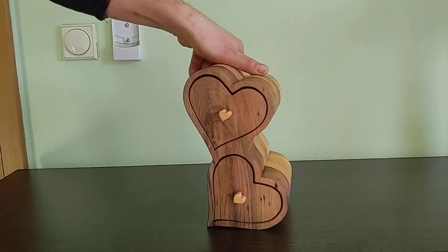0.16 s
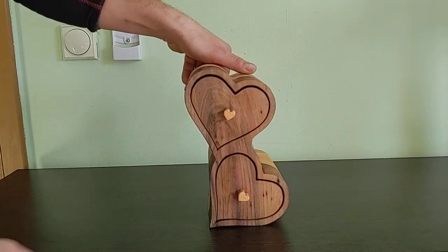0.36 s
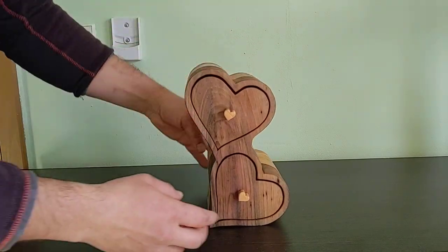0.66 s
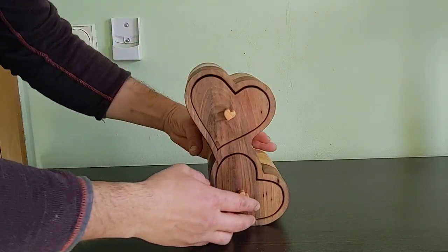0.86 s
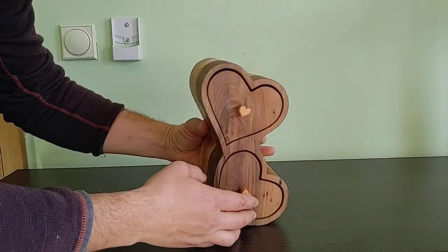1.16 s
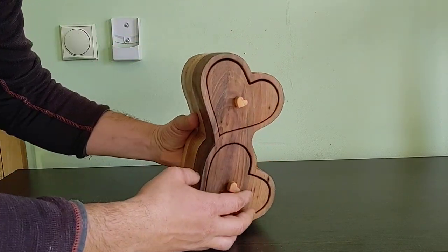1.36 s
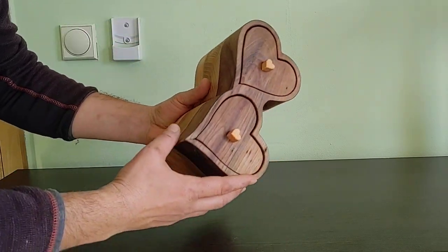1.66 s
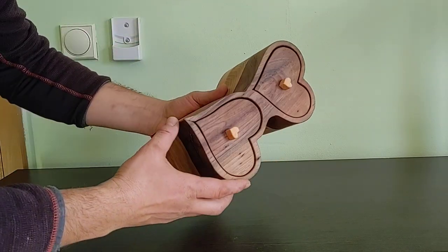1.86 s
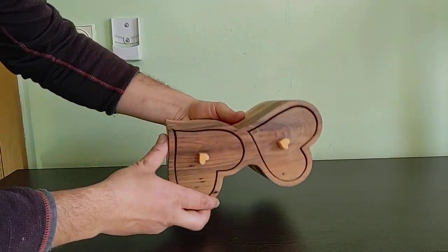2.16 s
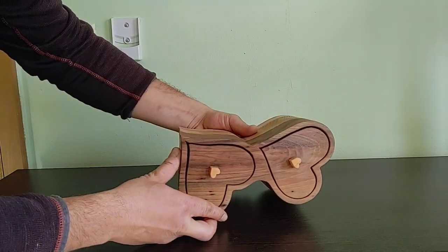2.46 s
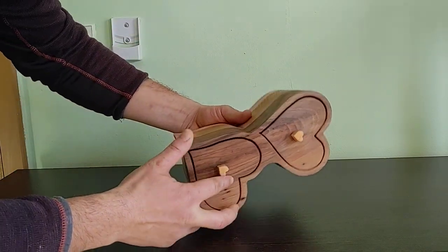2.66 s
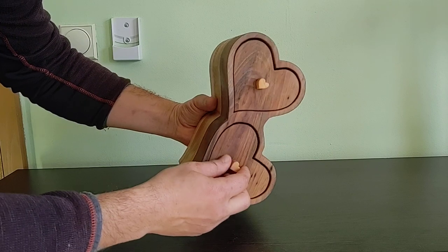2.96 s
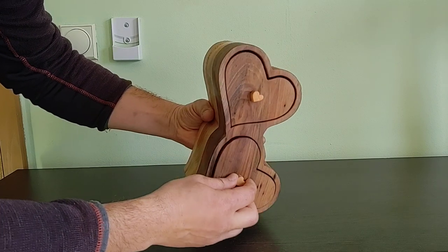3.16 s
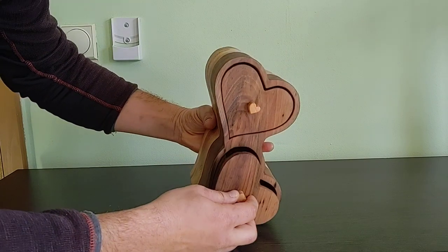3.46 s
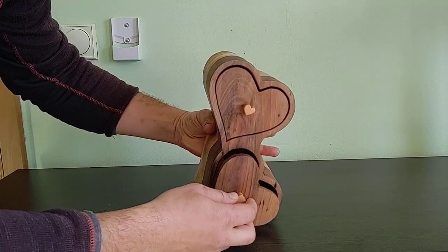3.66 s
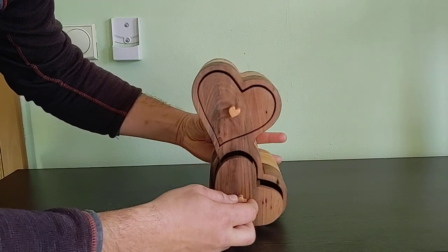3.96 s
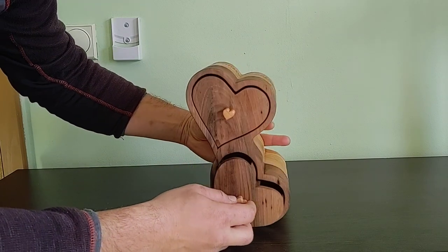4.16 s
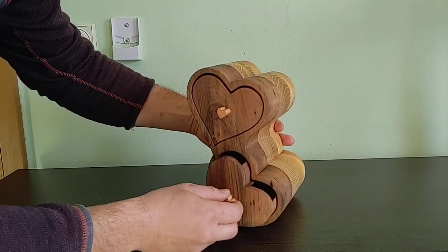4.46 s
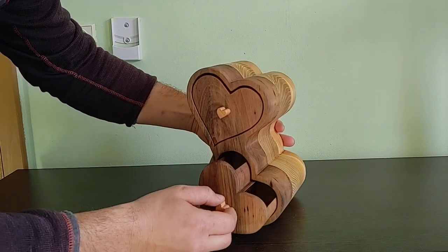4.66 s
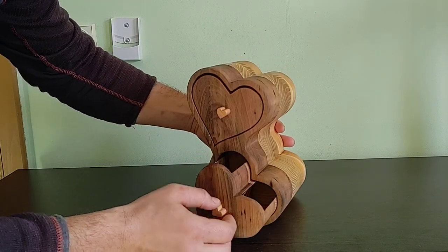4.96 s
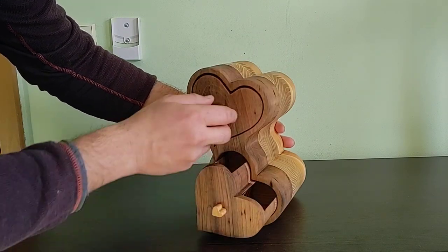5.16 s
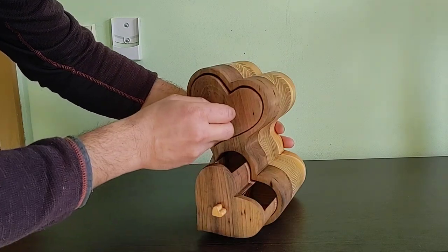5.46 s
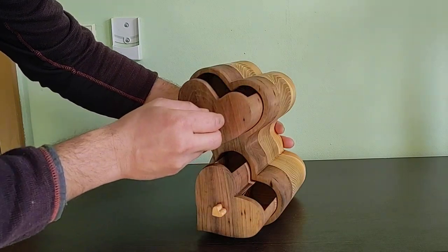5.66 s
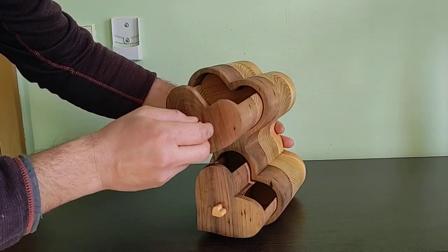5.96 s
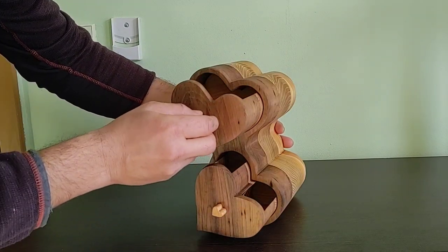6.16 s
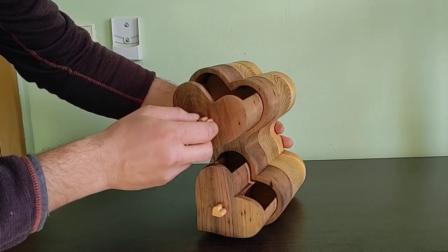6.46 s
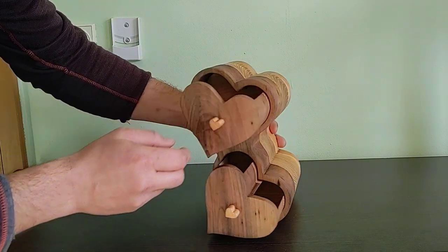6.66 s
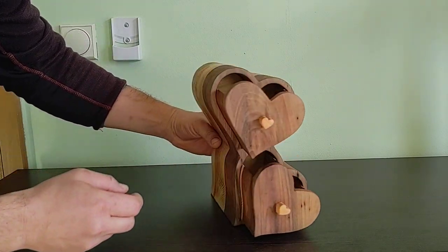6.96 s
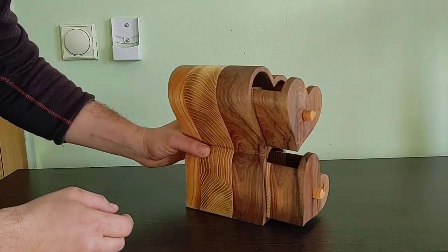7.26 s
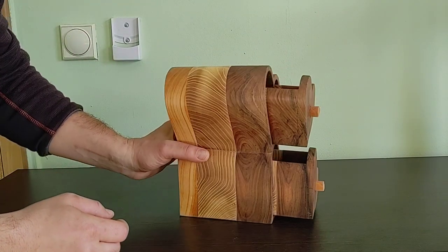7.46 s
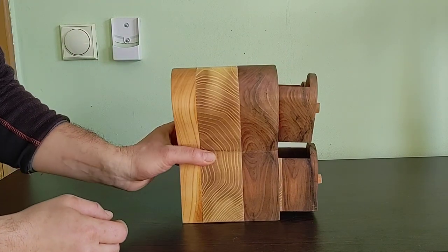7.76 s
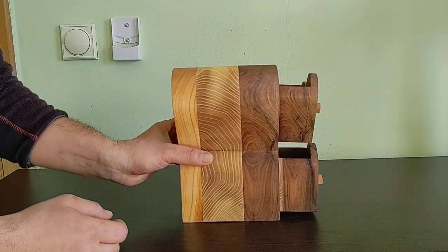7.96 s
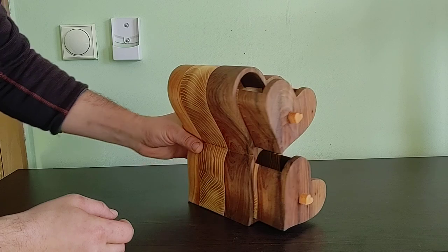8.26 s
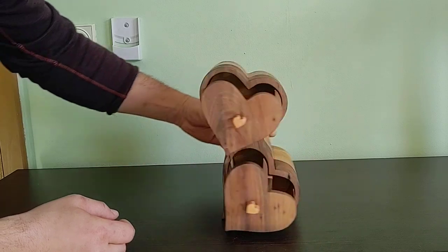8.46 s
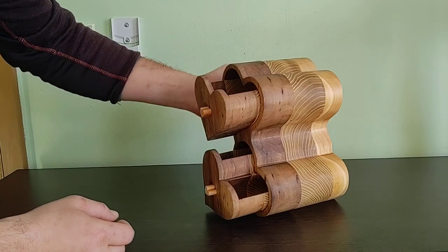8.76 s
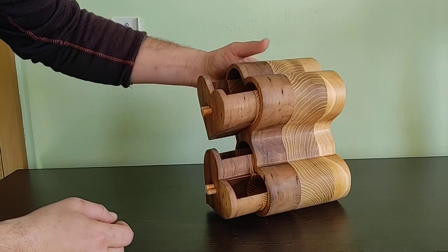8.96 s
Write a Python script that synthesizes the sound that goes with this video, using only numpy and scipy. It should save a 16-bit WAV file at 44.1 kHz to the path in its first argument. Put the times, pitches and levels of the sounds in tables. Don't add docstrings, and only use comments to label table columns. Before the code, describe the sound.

A small wooden box with drawers scrapes and knocks on a hollow table, its drawers rattle and slide open, then it grinds round in long turns.

```python
import sys
import numpy as np
from scipy import signal
from scipy.fft import rfft, irfft
from scipy.io import wavfile
from scipy.ndimage import uniform_filter1d

SR = 44100
rng = np.random.default_rng(int(sys.argv[2]) if len(sys.argv) > 2 else 0)


def elevation(decibels):
    levels = np.asarray(decibels, float)
    return 10 ** (levels / 20)


def dump_mix(stems):
    frames = np.atleast_2d(stems).T
    limited = np.clip(frames, -1, 1)
    pcm = np.round(limited * 32767).astype(np.int16)
    wavfile.write(sys.argv[1], SR, pcm)


N = 400869

# f/Hz, density/dB
HUSH_SPECTRUM = [(18, -48), (30, -13), (177, 4), (389, -4), (673, -6.5), (4300, -9), (4780, -9.5),
                 (6040, -5.5), (7250, -10), (8940, -11.5), (15500, -15)]
HUSH_DB = -75
ROOM_T60_S, ROOM_DB, WIDE_HZ = 0.24, -6, 1300

# start t/s, way/index
HOLDS = [
    (0, 0),
    (1.45, 1),
    (2.8, 2),
    (3.52, 1),
    (4.28, 3),
    (5.15, 4),
    (6.62, 0),
]
# start t/s, end t/s
LIFTS = [
    (1.3, 2.3),
    (2.55, 3.52),
]

# f/Hz, width/Hz, level/dB
TABLE_MODES = [(128.8, 16, -6), (99.5, 50, -19.5), (168.5, 13, -17)]
# f/Hz, width/Hz, then level/dB in each way of holding
BOX_MODES = [(202.2, 7, -3.5, -3.5, -26, -7, -2.5), (240.2, 36.6, -2, -14, -19.5, -1.5, -4.5),
             (268.7, 31, -6, -9, -26, -1.5, -1.5), (317, 30, 2.5, -0.5, -10, -1, -0.5),
             (358.9, 11, -1.5, -13.5, -7, -3.5, -6), (385.9, 17, -5.5, -5.5, -4, -1, -5),
             (459, 25, -3, -10.5, -14, 0, -2.5), (492.6, 7.9, -4.5, -16.5, -14, -6, -4.5),
             (526, 31, -4, -14.5, -22, -11, -11), (576, 28, -4, -10, -20, -7, -21),
             (634, 35, -7.5, -21.5, -13.5, -6, -11.5), (672.2, 16, -2, -13, -14.5, -3, -12),
             (702.7, 20, -6.5, -8.5, -9.5, -5, -13.5), (748, 33, -10, -9, -13.5, -7, -17.5),
             (836, 75, -7, -12, -14.5, -10, -14), (880, 25, -5.5, -18.5, -23, -8.5, -14.5)]
# f/Hz, width/Hz, then level/dB in each way of holding
WALL_MODES = [(944, 23, -3, -5.5, -11, 4, 2), (1055, 79, 0, 0.5, 3, -35, -1.5),
              (1244, 65, 0, 0.5, -1, -31, -8), (1402, 63, -3.5, -6.5, -5, -2.5, -3),
              (1517, 120, -1, -6, -10, -3, -9.5), (1728, 90, -3, -7, 5.5, -2, -6),
              (1900, 81, -5, -6, 1, -3, -5.5), (2110, 150, -0.5, -5.5, 0.5, 2, 2.5),
              (2343, 290, 1, -4.5, -1, 1.5, -1.5), (2652, 310, 0.5, -9, -5, -1, -6),
              (3140, 165, -7.5, -15, -11, 0, -27), (3420, 150, -10, -21.5, -4, -4, -9),
              (4080, 630, -5.5, -17.5, -16, -8, -13), (4155, 120, -8.5, -22, -3, -25, -36),
              (5100, 1400, -47, -32.5, -27, -23, -13)]
# f/Hz, width/Hz, level/dB
FACE_MODES = [(720, 260, -4.5), (1150, 470, -5)]
FACE_DB = [11, -1, -9, 3.5, 0]
RING_T60_S = [0.21, 0.53, 0.29, .4, 0.47]
# f/Hz, density/dB
DUST_SPECTRUM = [(1500, -1.5), (3000, 1), (5000, 1), (7000, -5), (10000, -16), (15000, -31.5)]
DUST_DB = [-24.5, -17.5, -11.5, -15.5, -10]

# t/s, length/s, f/Hz, half
# width/Hz, level/dB
SKIDS = [(1.112, 0.025, 530, 35, -60), (1.156, 0.04, 448, 29, -40), (1.184, 0.066, 2600, 190, -48),
         (3.285, 0.082, 1850, 150, -60), (5.266, 0.06, 4450, 120, -71.5), (8.608, 0.099, 4540, 800, -48),
         (8.86, .1, 223, 28, -59.5), (9.03, 0.063, 225, 30, -63), (8.513, 0.26, 692, 14.6, -42),
         (2.87, .11, 5600, 200, -70), (2.95, .13, 5850, 170, -68), (3.06, .07, 5600, 180, -69),
         (3.12, .07, 5250, 200, -72), (0.91, 0.47, 5700, 320, -76), (3.3, .05, 2000, 120, -60),
         (.628, .055, 2200, 700, -43), (1.21, .08, 800, 100, -51), (.63, .04, 4500, 900, -54),
         (0, .13, 2650, 120, -54), (7.08, .17, 2550, 200, -55), (8.36, .2, 3820, 70, -62),
         (8.36, .28, 2650, 130, -54), (8.72, .05, 2800, 60, -56), (7.45, .35, 700, 14, -62),
         (8.1, .2, 1260, 60, -53), (4.12, .04, 2150, 120, -52), (4.08, .03, 2000, 200, -46),
         (2.58, .07, 2350, 50, -76), (2.595, .03, 1350, 70, -68), (4.52, .3, 3120, 60, -70),
         (4.52, .3, 400, 25, -64), (1.735, .02, 1200, 90, -57), (7.1, .2, 390, 50, -47),
         (8.33, .15, 370, 40, -45), (7.2, .2, 3150, 80, -60), (6.75, .1, 680, 25, -50),
         (7.52, .3, 3300, 900, -66), (7.99, .16, 3100, 1300, -63), (6.68, .3, 3700, 700, -66),
         (4.15, .1, 2900, 500, -68), (4.14, .12, 980, 150, -55), (2.348, .03, 11500, 3500, -77),
         (4.065, .04, 11500, 3500, -75), (2.96, .04, 4300, 600, -70), (2.84, .025, 4400, 1300, -71),
         (3.605, .03, 1350, 150, -50)]
# t/s, f/Hz, peak level/dB, t60/s
RINGS = [(2.343, 300, -52, .1), (2.348, 199, -29, .33), (2.348, 339, -27, .2), (2.36, 393, -38, .45),
         (2.36, 764, -49, .37), (2.349, 264, -28, .2), (2.349, 452, -34, .16), (2.37, 570, -40, .2),
         (3.254, 380, -56, .15), (3.284, 392, -43, .25), (3.284, 355, -45, .25), (3.267, 520, -43, .12),
         (3.284, 700, -48, .2), (3.386, 392, -48, .33), (3.386, 360, -51, .3), (3.386, 748, -54, .25),
         (3.567, 1100, -38, .07), (3.57, 48, -54, .5), (4.052, 300, -46, .1), (4.071, 711, -28, .3),
         (4.064, 199, -31, .35), (4.062, 301, -26, .3), (4.058, 398, -25, .15), (4.08, 458, -37, .35),
         (4.071, 748, -33, .3), (4.1, 48, -54, .4), (7.972, 260, -54, .1), (7.99, 45, -56, .4),
         (.63, 199, -29, .4), (.683, 519, -27, .1), (1.215, 270, -36, .35), (1.737, 345, -41, .12),
         (1.683, 520, -42, .05), (3.567, 1900, -47, .06), (1.705, 800, -50, .08), (3.729, 700, -56, .08)]
# t/s, peak level/dB, strongest ring f/Hz, hardness/dB
KNOCKS = [(0.481, -23.5, 376, -14.5), (0.518, -24.5, 394, -18.5), (0.579, -23.5, 377, -30),
          (0.609, -19.5, 210, -27), (0.624, -15, 204, -9.5), (0.682, -27.5, 183, -9),
          (0.708, -26.5, 207, -17.5), (0.812, -24.5, 519, -9.5), (1.682, -38, 350, -19),
          (1.706, -39.5, 346, -12), (2.347, -19, 256, -16), (2.374, -24, 331, -19),
          (2.714, -57.5, 307, -17), (2.877, -43.5, 371, -10.5), (2.904, -43.5, 366, -16),
          (3.266, -39, 400, -13), (3.284, -50, 405, -10), (3.384, -46, 393, -14), (3.566, -27, 264, -4),
          (3.611, -27.5, 267, -16.5), (3.729, -47, 340, -8), (4.056, -20, 398, -12), (4.072, -23, 710, -18),
          (4.082, -17.5, 327, -14), (4.099, -29, 312, -27), (5.331, -45, 320, -25.5),
          (5.451, -51, 369, -19), (6.244, -37, 274, -34.5), (6.436, -41, 434, -15), (7.986, -27, 290, -21)]

# fastest t/s, rise/s, fall/s, level/dB
BRUSHES = [(.88, 0.15, 0.25, -66.5), (1.1, 0.17, 0.52, -73), (1.6, 0.25, 0.1, -79),
           (2.03, 0.27, 0.26, -80.5), (2.301, .06, .05, -83.5), (2.6, 0.088, 0.2, -73),
           (2.86, 0.091, 0.14, -72), (3.04, .2, 0.5, -76), (3.32, 0.11, 0.12, -69),
           (5.29, 0.052, 0.065, -83.5), (9.05, .07, .1, -80), (3.74, .015, .06, -77), (1.39, .07, .08, -76),
           (8.62, .42, .36, -65), (7.72, .26, .24, -79), (8.04, .06, .3, -76), (6.78, .15, .3, -80),
           (4.16, .06, .2, -80), (2.42, .05, .16, -80), (.53, .06, .14, -74), (.05, .1, .55, -74),
           (.64, .02, .07, -66), (2.36, .015, .07, -66), (4.085, .03, .05, -68)]
# t/s, half length/s, level/dB
ROCKS = [(.1, .09, -50), (.2, .06, -54), (.32, .07, -48), (.44, .05, -55), (3.75, .15, -66),
         (5.03, .06, -80), (5.28, .05, -76), (5.41, .07, -60), (5.53, .1, -60), (5.99, .09, -60),
         (6.52, .06, -62), (7.3, .1, -51), (7.45, .07, -50), (7.83, .11, -58), (8.2, .14, -50),
         (8.72, .2, -51), (9.02, .1, -68)]
# t/s, hold/s,
# t60/s, pressure level/dB, brightness level/dB
SHUDDERS = [(-.004, .012, .12, -27, -15), (0.482, 0.14, 0.54, -36, -14.5), (0.623, .1, .17, -31.5, -13),
            (0.813, 0.043, .4, -43.5, -4.5), (1.687, .07, .22, -47, -20), (2.346, .05, .3, -32, -15),
            (2.88, 0.015, 0.4, -45, -17.5), (3.262, .04, .3, -45, -16), (3.384, .03, .2, -52, -20),
            (3.568, 0.063, 0.21, -34, -10), (3.73, .022, 0.58, -56, -13), (4.058, 0.035, 0.36, -27, -13),
            (5.331, 0.053, .48, -60, -28), (6.249, .03, 0.14, -45.5, -26), (6.433, 0.018, 0.19, -41, -16.5),
            (7.989, 0.074, .55, -44, -9)]
# fastest t/s, rise/s, fall/s, pressure level/dB, speed as brightness level/dB
SLIDES = [(-.02, .1, .24, -35, -10), (.19, .1, .12, -48, -4), (.43, .05, .06, -58, -6),
          (0.321, 0.16, 0.15, -48, -3), (1.235, 0.15, 0.1, -35.5, -11), (1.4, .12, .1, -59, -5),
          (1.745, .04, .05, -54, -8), (2.1, .2, 0.26, -72, -10), (2.62, 0.074, 0.13, -71, -6),
          (3.33, .06, .2, -53, -6.5), (3.86, .2, .14, -64, -13), (4.02, .22, .07, -58, -2),
          (4.399, .2, .11, -49.5, -8.5), (4.66, 0.22, 0.2, -54.5, -2.5), (4.819, 0.22, 0.11, -58, -3),
          (5.5, 0.074, .24, -58, -12.5), (5.79, .3, .26, -47.5, -7.5), (6.16, 0.13, 0.14, -52.5, -12),
          (6.36, 0.079, 0.093, -53, -12), (5.95, .08, .09, -59, -16), (3.16, .04, .05, -64, -12),
          (2.97, .03, .06, -60, -8), (1.55, .1, .1, -72, -8), (9.05, .07, .12, -72, -4.5)]
# t/s, pressure level/dB, speed as brightness level/dB
TURNS = [
    [(6.58, -74, -15), (6.7, -50, -6.5), (6.82, -39, -11.5), (6.9, -45, -7.5), (7.13, -42, -3),
     (7.19, -34, -10), (7.26, -42, -3.5), (7.42, -43, -5), (7.6, -66, -3)],
    [(7.47, -76, -3), (7.57, -56, -3), (7.7, -51, -7), (7.84, -59.5, -5.5), (7.95, -75, -14)],
    [(7.99, -48, -13), (8.1, -46, -3), (8.25, -40, -4), (8.37, -36, -6), (8.5, -38, -5), (8.6, -37, -2.5),
     (8.71, -39, -5), (8.81, -45.5, -6), (8.99, -74, -8)],
]
# t/s, f/Hz
REACH = [(0, 3600), (.33, 3600), (.45, 1800), (.5, 3600), (1.4, 3600), (6.62, 2000), (6.8, 3000),
         (7.0, 3300), (7.3, 4000), (7.48, 3600), (7.56, 2400), (7.95, 1800), (8.0, 1300), (8.1, 2400),
         (8.2, 3300), (8.3, 4000), (8.65, 5500), (8.9, 2400)]

SLACK_DB, SLACK_POWER = -27.5, 1.76
LIFTED_DB, TABLE_SLIDE_DB, TABLE_SHUDDER_DB, TABLE_KNOCK_DB = -24, -14, -11, -20
TABLE_SLOPE = 0.88
JOLT_S, SCRAPE_FADE, DUST_FADE = .004, 1.26, 2.5
DUST_SHUDDER_DB, BRUSH_SCRAPE_DB = -22, -4.5
REACH_DB_PER_OCTAVE, REACH_FLOOR_DB = -10, -6


def set_rms(x, db):
    return x * elevation(db) / np.sqrt(np.mean(x ** 2))


def colour(x, points):
    hz, db = np.transpose(points)
    log_hz = np.log(np.fft.rfftfreq(N, 1 / SR) + 1)
    return irfft(rfft(x) * elevation(np.interp(log_hz, np.log(hz), db)), N)


def band(x, lo_hz, hi_hz):
    return signal.sosfilt(signal.butter(3, [lo_hz, hi_hz], "band", fs=SR, output="sos"), x)


def highpass(x, hz, order=1):
    return signal.lfilter(*signal.butter(order, hz, "high", fs=SR), x)


def walk(rate_hz, count):
    hold = int(SR / rate_hz)
    steps = np.repeat(rng.standard_normal((count, N // hold + 1)), hold, axis=1)
    return 1.2 * uniform_filter1d(steps, hold, axis=1)[:, :N]


def slips(rate_hz, spread_db):
    happens = rng.random(N) < rate_hz / SR
    size = rng.standard_normal(N) * elevation(spread_db * rng.exponential(size=N))
    return set_rms(happens * size, 0)


def holding(s):
    start, way = np.transpose(HOLDS)
    return way.astype(int)[np.searchsorted(start, s, side="right") - 1]


def lifted_db(s):
    return LIFTED_DB * any(a < s < b for a, b in LIFTS)


def hush():
    return set_rms(colour(rng.standard_normal((2, N)), HUSH_SPECTRUM), HUSH_DB)


def room(x):
    t = np.arange(SR // 2) / SR
    decay = np.exp(-np.log(1000) * t / ROOM_T60_S) * (1 - np.exp(-t / 0.0037))
    tail = rng.standard_normal((2, len(t))) * decay
    tail = elevation(ROOM_DB) * tail / np.sqrt(np.sum(tail ** 2, axis=1, keepdims=True))
    side = elevation(6.5) * highpass(signal.fftconvolve(x, tail[1])[:N], WIDE_HZ)
    mid = x + highpass(signal.fftconvolve(x, tail[0])[:N], 300)
    return np.array([elevation(1.64) * (mid + side), elevation(1.06) * (mid - side)])


def skids():
    out, t = np.zeros(N + SR), np.arange(SR) / SR
    force = slips(9000, spread_db=-0.5)
    for s, length, hz, half_width, db in SKIDS:
        i = int(s * SR)
        shape = (1 - np.exp(-t / (0.13 * length))) * np.exp(-(t / length) ** 3)
        song = band(np.resize(force[i:], SR), hz - half_width, hz + half_width)
        out[i:i + SR] += set_rms(song, db) * shape
    return out[:N]


def rings():
    out, t = np.zeros(N + SR), np.arange(SR // 2) / SR
    for s, hz, db, t60 in RINGS:
        envelope = elevation(db - 60 * t / t60) * (1 - np.exp(-t / .004))
        out[int(s * SR):][:len(t)] += envelope * np.sin(2 * np.pi * hz * t)
    return out[:N]


def struck(modes, way, t, chance, t60, focus_db=0):
    hz, width, *db = np.transpose(modes)[:, :, None]
    decay = np.exp(-t * (np.log(1000) / t60 + 1.28 * width))
    spot_db = 2.5 * chance[:len(hz), None]
    side = np.sign(chance[-len(hz):, None] + .6)
    gain = side * elevation(db[way] + focus_db + spot_db)
    x = np.sum(gain * decay * np.sin(2 * np.pi * hz * t), axis=0)
    return x / np.abs(x).max()


def knocks():
    out, t = np.zeros(N + SR), np.arange(SR // 3) / SR
    chances = rng.standard_normal((len(KNOCKS), 64))
    grit = set_rms(colour(rng.standard_normal(N), DUST_SPECTRUM), 0)
    for (s, db, hz, hard_db), chance in zip(KNOCKS, chances):
        i, way = int(s * SR), holding(s)
        t60 = RING_T60_S[way]
        focus_db = -4.0 * np.abs(np.log2(np.array(BOX_MODES)[:, :1] / hz))
        body = band(struck(BOX_MODES, way, t, chance, t60, focus_db), 165, 2400)
        body = body + elevation(TABLE_KNOCK_DB + lifted_db(s)) * struck(TABLE_MODES, 0, t, chance[20:], t60)
        face = band(struck(FACE_MODES, 0, t, chance[24:], t60), 300, 3000)
        body = body + elevation(hard_db + FACE_DB[way]) * face
        push = np.hanning(int(SR * .00035 * elevation(-.6 * hard_db)) + 3)
        body = np.convolve(body, push / push.sum())[:len(t)] * (1 - np.exp(-t / .001))
        contact = 1 - np.exp(-t / .0012)
        crack = np.resize(grit[i:], len(t)) * np.exp(-t / 0.013)
        walls = contact * (struck(WALL_MODES, way, t, chance[32:], 0.68 * t60) + elevation(-24.0) * crack)
        out[i:i + len(t)] -= elevation(db) * (body + elevation(hard_db) * walls)
    return out[:N]


def stroke(t, s, rise, fall):
    return SLACK_DB * np.where(t < s, (s - t) / rise, (t - s) / fall) ** SLACK_POWER


def brush(t, s, rise, fall, db):
    return elevation(db + stroke(t, s, rise, fall) + np.array([[BRUSH_SCRAPE_DB], [0]])) ** 2


def shudder(t, s, hold, t60, db, bright_db):
    fade = -60 / t60 * np.clip(t - s - hold, 0, 9)
    dust_fade = -60 / t60 * np.clip(t - s, 0, 9)
    table_db = db + TABLE_SHUDDER_DB + lifted_db(s) + fade
    scrape_db = db + bright_db + SCRAPE_FADE * fade
    dust_db = db + bright_db + DUST_SHUDDER_DB + DUST_FADE * dust_fade
    start = np.clip((t - s) / JOLT_S, 0, 1)
    return (start * elevation([table_db, db + fade, scrape_db, dust_db])) ** 2


def sliding(db, bright_db, s):
    table_db = TABLE_SLOPE * (db + 45) - 45 + TABLE_SLIDE_DB + lifted_db(s)
    dust_db = db + 1.4 * bright_db + DUST_DB[holding(s)]
    return elevation([table_db, db, db + bright_db, dust_db]) ** 2


def efforts(t):
    out = np.full((4, len(t)), 1e-14)
    for s, length, db in ROCKS:
        out[0] += elevation(db + stroke(t, s, length, length)) ** 2
    for event in BRUSHES:
        out[2:] += brush(t, *event)
    for event in SHUDDERS:
        out += shudder(t, *event)
    for s, rise, fall, db, bright_db in SLIDES:
        out += sliding(db + stroke(t, s, rise, fall), bright_db, s)
    for s, db, bright_db in map(np.transpose, TURNS):
        push = sliding(np.interp(t, s, db), np.interp(t, s, bright_db), s[-1])
        out += push * ((t > s[0]) & (t < s[-1]))
    return out


def pressure(s, db):
    t = np.arange(N) / SR
    db = np.interp(t, s, db)
    blows = np.array(KNOCKS)[:, 0]
    ahead, after = int(.04 * SR), int(.2 * SR)
    for blow in blows[np.diff(blows, prepend=0) > .045]:
        i = int(blow * SR)
        db[i - ahead:i] = np.minimum(db[i - ahead:i], db[i - ahead])
        db[i:i + after] -= 4.8 * np.exp(-t[:after] / 0.07)
    return elevation(db)


def reach(hz):
    t = np.arange(0, N, 32) / SR
    top_hz = np.interp(t, *np.transpose(REACH))
    db = np.clip(REACH_DB_PER_OCTAVE * np.log2(hz / top_hz), REACH_FLOOR_DB, 0)
    return np.repeat(elevation(db * (holding(t) == 0)), 32)[:N]


def ring(force, modes, way, wander_db, rate_hz, woken=lambda hz: 1):
    share = elevation(wander_db * walk(rate_hz, count=len(modes))[:, ::32])
    share = np.repeat(share, 32, axis=1)[:, :N]
    gain = elevation(np.array(modes)[:, 2:])
    gain = gain / np.sqrt(np.sum(gain ** 2, axis=0))
    out = 0
    for k, (hz, width, *_) in enumerate(modes):
        tone = signal.lfilter(*signal.iirpeak(hz, hz / width, fs=SR), force * share[k])
        out = out + (-1) ** k * gain[k][way] * woken(hz) * set_rms(tone, 0)
    return out


def rubbing():
    s = np.arange(0, N / SR, .002)
    table, box, scrape, dust = (pressure(s, 10 * np.log10(power)) for power in efforts(s))
    way = holding(np.arange(N) / SR)
    catch = elevation(walk(25, count=1)[0])
    force = catch * slips(2500, spread_db=1.5)
    fine = catch * slips(9000, spread_db=0.5)
    top = band(ring(force, TABLE_MODES, 0, wander_db=2.5, rate_hz=6), 75, 220)
    body = band(ring(force, BOX_MODES, way, wander_db=2.5, rate_hz=5), 190, 1500)
    walls = band(ring(fine, WALL_MODES, way, wander_db=1.06, rate_hz=9, woken=reach), 965, 6000)
    speed = np.where(way == 0, np.clip(scrape / elevation(-46), .05, 2) ** 0.23, 1)
    walls = walls + (speed - 1) * band(walls, 1500, 7000)
    hiss = set_rms(colour(catch * slips(9000, spread_db=1.18), DUST_SPECTRUM), 0)
    return elevation(-1.0) * table * top + elevation(-1.5) * box * body + scrape * walls + elevation(7.5) * dust * hiss


def scene():
    return hush() + room(skids() + rings() + knocks() + rubbing())


def top_cut(x):
    return signal.sosfilt(signal.butter(12, 15630, fs=SR, output="sos"), x)


def record(dry):
    dry = dry - np.array([[.12], [-.12]]) * band(dry, 6000, 11000)
    return top_cut(highpass(dry, 70, order=2))


dry = scene()
out = record(dry)
dump_mix(out)
```